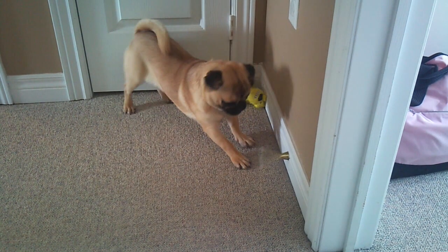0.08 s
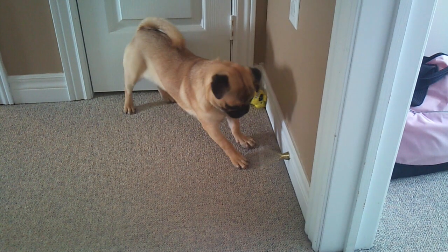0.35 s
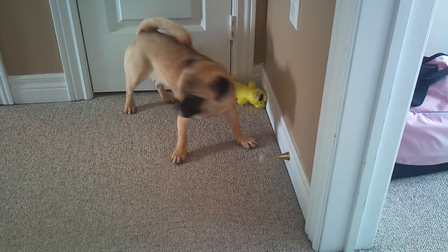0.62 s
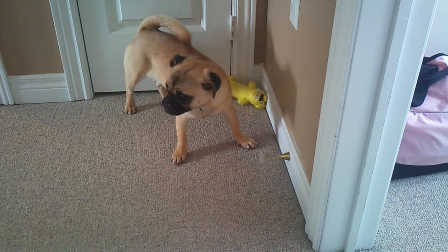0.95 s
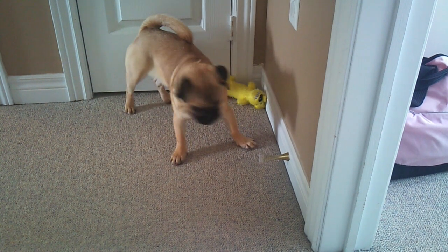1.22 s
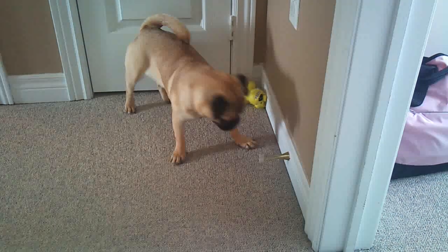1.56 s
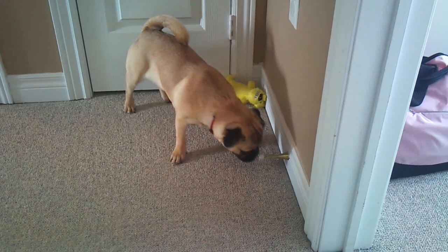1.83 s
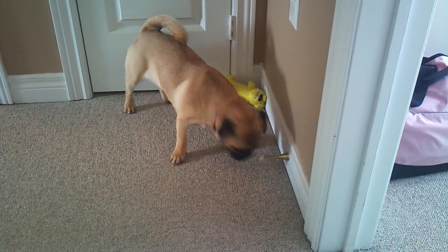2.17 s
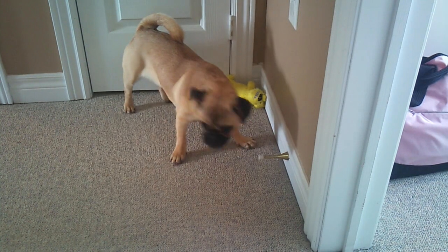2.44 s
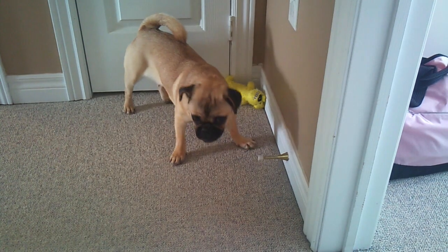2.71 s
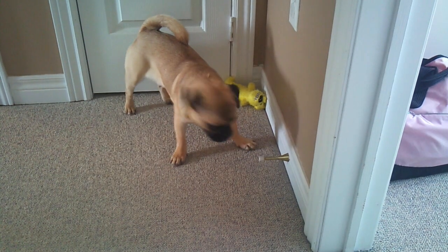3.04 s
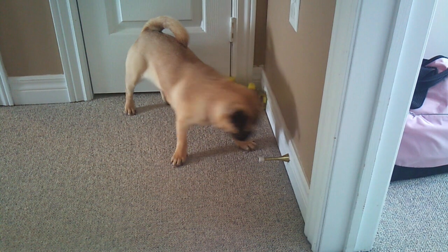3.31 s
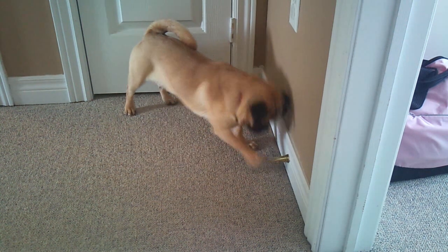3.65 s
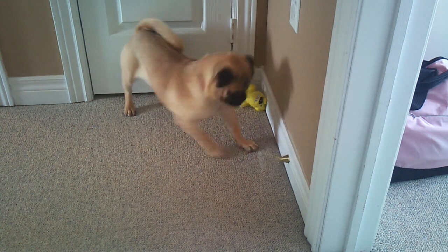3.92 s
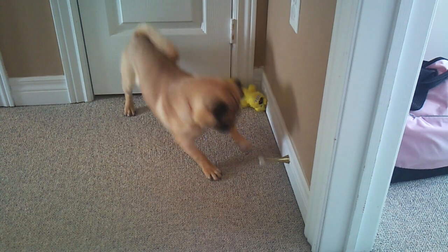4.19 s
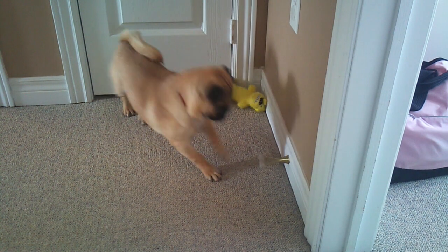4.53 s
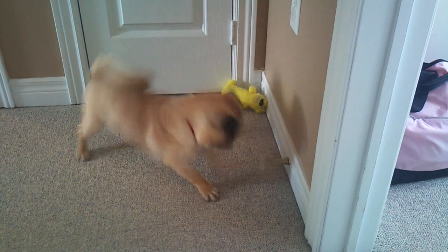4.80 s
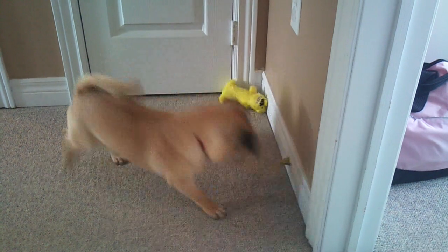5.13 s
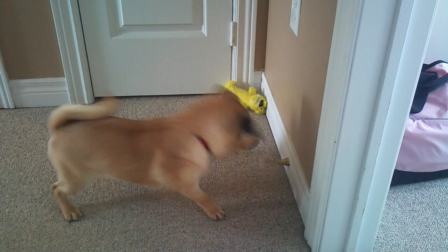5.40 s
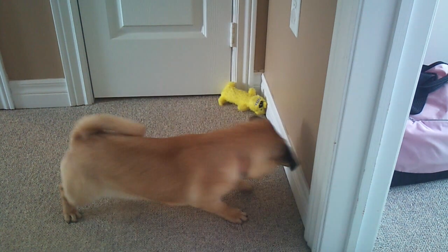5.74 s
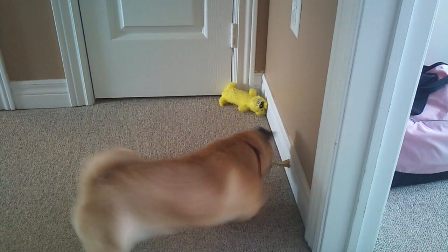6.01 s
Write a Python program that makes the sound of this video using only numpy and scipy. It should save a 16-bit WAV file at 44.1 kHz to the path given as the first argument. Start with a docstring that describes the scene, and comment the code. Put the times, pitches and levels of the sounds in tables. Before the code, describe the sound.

In a quiet hallway, a metal spring doorstop clacks and rattles rapidly as a dog bats it, the chatter fading over about three seconds. A harder swipe brings a loud buzzing boing, and further hits keep the coils clattering to the end. Dull thumps from the hollow wall, faint scuffs from the dog and the still air of the house lie beneath. The sound is slightly dulled on top and rings briefly in the hall.

```python
"""Metallic clacks, a hard buzzing twang and long dying chatters: a dog paws at a coiled spring doorstop
on the skirting board of a carpeted hallway. The spring swings and its coils slap together.
Every slap drives the same board and hollow wall, which ring into the hall.
Dull booms of the wall, the dog's soft scuffs and the still air of the house lie underneath."""
import sys
import numpy as np
from scipy import signal
from scipy.fft import rfft, irfft
from scipy.io import wavfile
from scipy.ndimage import uniform_filter1d

SR = 44100
rng = np.random.default_rng(int(sys.argv[2]) if len(sys.argv) > 2 else 0)


def master_out(mix):
    """Clip the mix to full scale and print it as 16-bit PCM to the path in sys.argv[1]."""
    frames = np.transpose(np.atleast_2d(mix))
    ceiling = np.clip(frames, -1, 1)
    pcm = np.round(ceiling * 32767).astype(np.int16)
    wavfile.write(sys.argv[1], SR, pcm)


N = 267246

# The spring is left to swing: (start [s], end [s], then at the start: knock [dB], thump [dB], slaps [1/s])
SWINGS = [(0.0, 0.33, -37.5, -54.5, 34.3), (0.5, 3.8, -40, -53, 32.5), (4.55, 5.27, -40.5, -50.5, 36),
          (5.36, 6.3, -41, -54.5, 37.4)]
THUMP_EDGE_HZ, TICK_EDGE_HZ = 532, 1720   # a slap's thump lies below these, its knock between, its tick above
CUTOFF_HZ, RESPONSE_SIZE = 7430, 32768


def from_db(db):
    """Decibels to gain."""
    return np.exp(np.asarray(db) * np.log(10) / 20)


def rms(x):
    """Root mean square."""
    return np.sqrt(np.mean(x ** 2) + 1e-20)


def at_hz(points, hz):
    """Read a table on a log-frequency axis."""
    known_hz, values = np.transpose(points)
    return np.interp(np.log(np.maximum(hz, 1)), np.log(known_hz), values)


def passed(x, hz, kind):
    """Second-order Butterworth filter."""
    return signal.sosfilt(signal.butter(2, hz, kind, fs=SR, output="sos"), x)


def air(level_db=-59.5):
    """Room tone: the faint, steady, low noise of the house."""
    # Colour of the still air: (frequency [Hz], relative level [dB])
    colour = [(25, -15.5), (60, -13.5), (120, -4), (170, 0.5), (250, 2.5), (400, -21.5), (800, -17.5),
              (1500, -25), (3000, -24.5), (7000, -32)]
    gain = from_db(at_hz(colour, np.fft.rfftfreq(N, 1 / SR)))
    noise = irfft(rfft(rng.standard_normal(N)) * gain, N)
    return from_db(level_db) * noise / rms(noise)


def scuffs():
    """The dog's short rubs: bands of noise that swell quickly and fade."""
    # Soft scuffs and brushes: (time [s], length [s], level [dB], low edge [Hz], high edge [Hz])
    rubs = [(2.06, .08, -65, 4200, 7000), (2.66, .065, -43, 850, 2000), (2.654, .045, -61, 2000, 6000),
            (3.742, .06, -59, 2250, 5530), (3.746, .07, -61.5, 2630, 2790)]
    out = np.zeros(N)
    for s, length, db, low_hz, high_hz in rubs:
        age = np.maximum(np.arange(N) / SR - s, 0) / (length / 4)
        rub = passed(rng.standard_normal(N), [low_hz, high_hz], "band")
        out += from_db(db) * age * np.exp(1 - age) * rub / rms(rub)
    return out


def wall_booms(swell_s=0.019, detune=0.029):
    """A soft push makes the hollow wall boom; the notes swell and die in about a tenth of a second."""
    # The wall's lowest modes: (frequency [Hz], relative level [dB])
    modes = [(170, -3), (250, -7.5)]
    # Dull bumps that set them booming: (time [s], level [dB])
    bumps = [(0.313, -35.5), (0.406, -37), (0.702, -34.5), (0.935, -45), (1.116, -35), (1.98, -43),
             (2.284, -47), (2.486, -41), (3.747, -63), (4.603, -42.5), (4.895, -45), (5.148, -45),
             (5.889, -36.5)]
    out = np.zeros(N)
    for (s, db), offsets in zip(bumps, rng.standard_normal((len(bumps), len(modes)))):
        age = np.maximum(np.arange(N) / SR - s, 0)
        notes = sum(from_db(mode_db) * np.sin(2 * np.pi * hz * (1 + detune * offset) * age)
                    for (hz, mode_db), offset in zip(modes, offsets))
        out += from_db(db) * age / swell_s * np.exp(1 - age / swell_s) * notes
    return out


def wire_ring(t, detune=0.017):
    """The coil's modes, struck together: a short metallic clank, tuned a little differently each call."""
    # Modes of the wire: (frequency [Hz], resonance height [dB], t60 [s])
    modes = [(1020, -3, 0.019), (1370, -9, 0.016), (2023, 7.5, 0.021), (2376, 11, 0.056),
             (3167, 10.5, 0.027), (3183, 8, 0.032), (3800, -1.5, 0.0064), (4130, 17, 0.021),
             (4806, 15, 0.019), (5140, -0.5, 0.016), (5650, 3, 0.022), (6240, -12.5, 0.027)]
    out = np.zeros(len(t))
    for (hz, db, t60), offset in zip(modes, rng.standard_normal(len(modes))):
        fade = from_db(-60 * t / t60)
        out += from_db(db) * fade / fade.sum() * np.sin(2 * np.pi * hz * (1 + detune * offset) * t)
    return out


def reflections(hall_db, clank_db, echo_db, mid_hz=1200, treble_hz=4500):
    """The wire's clank and the board's short ring, echoes off the near walls, then the hall's tail."""
    # How long the board rings: (frequency [Hz], t60 [s])
    board_t60 = [(152, 0.12), (352, 0.081), (1010, 0.015), (2210, 0.056), (5010, 0.026)]
    # How long the hall rings: (frequency [Hz], t60 [s])
    hall_t60 = [(150, 0.4), (350, 0.88), (1000, 0.23), (2200, 0.34), (5000, 0.35)]
    # The hall's tail against the board: (frequency [Hz], level [dB])
    hall_colour = [(150, -12), (1000, -10.5), (2200, -5), (5000, -9)]
    # The near walls throw each slap back: (delay [s], mid level [dB], treble level [dB])
    echoes = [(.0078, 1, -13.5), (0.011, -5, -4), (.028, -10, -19.5), (0.04, -9, -16)]
    t, hz = np.arange(RESPONSE_SIZE) / SR, np.fft.rfftfreq(RESPONSE_SIZE, 1 / SR)
    white = rfft(rng.standard_normal(RESPONSE_SIZE))
    out = from_db(clank_db) * wire_ring(t)
    octaves_hz = np.geomspace(125, 8000, 7)
    for centre, share in zip(octaves_hz, np.eye(len(octaves_hz))):
        band = irfft(white * at_hz(list(zip(octaves_hz, share)), hz))
        arrivals = [(0, 0)] + [(s, echo_db + at_hz([(mid_hz, mid), (treble_hz, treble)], centre))
                               for s, mid, treble in echoes]
        board_power = sum((t >= s) * from_db(db - 60 * abs(t - s) / at_hz(board_t60, centre)) ** 2
                          for s, db in arrivals)
        hall = from_db(hall_db + at_hz(hall_colour, centre) - 60 * t / at_hz(hall_t60, centre))
        out += band * np.sqrt(board_power + hall ** 2)
    return out


def faded(response):
    """Let the second half of a response sink to nothing."""
    return response * np.minimum(np.linspace(2, 0, len(response)), 1) ** 2


def evened(response, smoothing_bins=(25, 200)):
    """Flatten chance peaks: closely where the resonances stand apart, loosely where they crowd."""
    hz, spectrum = np.fft.rfftfreq(RESPONSE_SIZE, 1 / SR), rfft(response)
    power = abs(spectrum) ** 2
    fine, wide = (uniform_filter1d(uniform_filter1d(power, n), n) for n in smoothing_bins)
    return faded(irfft(spectrum / np.sqrt(np.where(hz < TICK_EDGE_HZ, fine, wide))))


def causal(gain):
    """The minimum-phase filter that has these gains: it rings only after the blow."""
    cepstrum = irfft(np.log(gain + 1e-9))
    half = len(cepstrum) // 2
    cepstrum[1:half] *= 2
    cepstrum[half + 1:] = 0
    return np.exp(rfft(cepstrum))


def coil_chirp(hz, lag_s, from_hz=4300):
    """Phase of waves on the coil: the highest arrive late, so each slap ends in a tiny upward chirp."""
    delay = lag_s * np.clip((hz - from_hz) / (CUTOFF_HZ - from_hz), 0, 1)
    return np.exp(-2j * np.pi * np.cumsum(delay) * hz[1])


def wall_response(hall_db, chirp_s, clank_db=24.5, echo_db=0.0, ring=()):
    """One slap as heard in the hall: the reflections, coloured by the resonances of wall and coil."""
    # Broad colour of the wall: (frequency [Hz], level [dB])
    colour = [(45.45, -21.5), (101.0, -12.5), (151.5, -1.5), (323.2, -4), (404.0, -11), (707.0, 1),
              (1111.0, 2), (1717.0, -4.5), (2525.0, -10.5), (3737.0, -13.5), (4848.0, -17.5),
              (5858.0, -19.5), (6969.0, -25), (7474.0, -48)]
    # Resonances of board, wall and coil: (frequency [Hz], width [Hz], lift above the colour [dB])
    resonances = [(171, 15, 13.5), (203, 30, 4.5), (249.8, 19.7, 13), (290.5, 11, 5), (322.5, 28, 14),
                  (350.3, 39, 11), (423, 23, 13), (509, 23, 7), (580, 23, 8), (660, 15, 9.5), (791, 57, 9),
                  (933, 55, 7.5), (1016, 72, 9), (1059, 35, 5.5), (1117, 21, 7.5), (1200, 30, 2),
                  (1272.7, 57, 12), (1354, 22, 7), (1399, 18, 5), (1462, 88, 4), (1530, 11, 8.5),
                  (1625, 15, 8.5), (1955, 130, 3), (2506, 180, 4.5), (2930, 540, 4.5), (3290, 120, 6),
                  (4306, 280, 7), (4690, 260, 6), (5150, 210, 5), (6476, 140, 7)]
    hz = np.fft.rfftfreq(RESPONSE_SIZE, 1 / SR)
    peaks_db = sum(db / (1 + (2 * (hz - centre) / width) ** 2)
                   for centre, width, db in [*resonances, *ring])
    body = causal(from_db(at_hz(colour, hz) + peaks_db))
    space = rfft(evened(reflections(hall_db, clank_db, echo_db)))
    response = irfft(space * body * coil_chirp(hz, chirp_s))
    return passed(faded(response), 46, "high")


def registers(response, opening_samples=(882, 4410, 882)):
    """The knock, thump and tick of a response, each with rms 1 over its loud opening."""
    def split(x, hz):
        return [passed(passed(x, hz, kind), hz, kind) for kind in ("low", "high")]
    thump, rest = split(response, THUMP_EDGE_HZ)
    knock, tick = split(rest, TICK_EDGE_HZ)
    return [part / rms(part[:size]) for part, size in zip((knock, thump, tick), opening_samples)]


def play(contacts, response):
    """Contacts at one place on the coil share a response: (time [s], knock [dB], thump [dB], tick [dB])."""
    onsets = np.clip(np.round(contacts[:, 0] * SR).astype(int), 0, N - 1)
    out = np.zeros(N)
    for level_db, part in zip(contacts[:, 1:].T, registers(response)):
        impulses = np.bincount(onsets, from_db(level_db), N)
        out += signal.oaconvolve(impulses, part)[:N]
    return out


def rebounds(hits, softer_db, within_s, after_s=0, count=3, spread_db=8):
    """A slap runs along the spring and other coils touch just after; softer_db is (knock, thump, tick)."""
    rows = np.repeat(hits, count, axis=0)
    late, weak = rng.random((len(rows), 2)).T
    times = rows[:, 0] + after_s + within_s * late
    return np.column_stack([times, rows[:, 1:] + softer_db - spread_db * weak[:, None]])


def swing_left(age, settle_s=3.6, damping_db_per_s=2.1, least=.07):
    """The share of a swing that is left: dry friction shrinks it linearly, the mount damps it further."""
    return np.clip((1 - age / settle_s) * from_db(-damping_db_per_s * age), least, 1)


def slap_rate(times, settled_per_s=44):
    """Slaps per second: the smaller the swing, the quicker."""
    start, *_, first_rate = np.transpose(SWINGS)
    latest = np.maximum(np.searchsorted(start, times) - 1, 0)
    return settled_per_s + (first_rate[latest] - settled_per_s) * swing_left(times - start[latest])


def light_touches(swing, knock_db=-6, tick_db=-15, thump_fade=0.61, uneven_db=3, jitter_s=.0022):
    """The coils touch on every half swing, never quite in time or equally hard; the thump fades slowest."""
    start, end, swing_db, thump_db, _ = swing
    most_touches = 160
    timing, force, sharpness = np.clip(rng.standard_normal((most_touches, 3)).T, -2, 2)
    t = np.arange(int(start * SR), int(end * SR)) / SR
    times = np.interp(np.arange(most_touches), np.cumsum(slap_rate(t)) / SR, t)
    shrink_db = 20 * np.log10(swing_left(times - start))
    knock = swing_db + knock_db + shrink_db + uneven_db * force
    thump = thump_db + thump_fade * shrink_db + uneven_db * force
    tick = swing_db + tick_db + shrink_db + uneven_db * sharpness
    return np.column_stack([times + jitter_s * timing, knock, thump, tick])[times < t[-1]]


def lulled(touches, hits, lull_s=0.016, lull_db=6.5):
    """The coils part just before a clack, so the chatter sinks; the wall hums on."""
    s, knock, thump, tick = touches.T
    ahead = hits[:, 0] - s[:, None]
    wait = np.where(ahead > 0, ahead, np.inf).min(axis=1)
    sink_db = lull_db * np.exp(-(wait / lull_s) ** 2)
    return np.column_stack([s, knock - sink_db, thump, tick - sink_db])


def chatter(hits):
    """The free swing touches the two sides of the coil in turn, each time with a few softer rebounds."""
    light = np.vstack([light_touches(swing) for swing in SWINGS])
    after = rebounds(light, softer_db=(-6.5, -10, -5.5), within_s=.016)
    return sum(play(lulled(touches, hits), wall_response(hall_db=1.0, chirp_s=.0045))
               for touches in (light[0::2], light[1::2], after))


def slaps(times, knock_db, tick_db, middling_knock_db=-38.5, middling_thump_db=-49, thump_growth=0.82):
    """Contacts of given force: the wall's thump grows more slowly than the knock."""
    thump_db = middling_thump_db + thump_growth * (knock_db - middling_knock_db)
    return np.column_stack([times, knock_db, thump_db, knock_db + tick_db])


def surges(start_s=3.0615, period_s=.187, count=4, knock_db=-50, fade_db_per_s=11, tick_db=-12):
    """The two bending planes beat as the swing dies: at each surge the coils meet twice, a swing apart."""
    age = period_s * np.arange(count)
    times, level_db = start_s + age, knock_db - fade_db_per_s * age
    first = slaps(times, level_db, tick_db)
    second = slaps(times + 2 / slap_rate(times), level_db - 2, tick_db)
    rows = np.vstack([first, second])
    rows[:, 2] -= 4   # less thump: they hardly move the wall
    return rows


def clacks(hits, hard_above_db=-28.3, places=3):
    """Hard blows clank; lighter ones land at a few places on the coil, each with its own ring."""
    # How the coil's ring changes when struck hard: (frequency [Hz], width [Hz], gain [dB])
    hard_ring = [(175, 54, -6.5), (520, 140, 0.5), (1900, 270, 3.5), (3070, 330, 3), (3650, 420, -2),
                 (4450, 600, 3), (5900, 450, -6)]
    hard = hits[:, 1] > hard_above_db
    after = rebounds(hits, softer_db=(-11, -11, -14), within_s=.016)
    lighter = sum(play(hits[~hard][k::places], wall_response(hall_db=-2.0, chirp_s=.003, clank_db=22.5))
                  for k in range(places))
    clank = wall_response(hall_db=-2.5, chirp_s=.00099, clank_db=28.0, echo_db=0.5, ring=hard_ring)
    return play(hits[hard], clank) + lighter + play(after, wall_response(hall_db=3.5, chirp_s=.0036))


def twang_slaps(start_s=3.981, gap_s=.032, shortening_s=.00042, lead_s=.0019, count=16):
    """The swings quicken and dull as they shrink; the back swing strikes early, softer and duller."""
    # each is (knock, thump, tick)
    start_db, fade_db_per_s, back_swing_db = (-26.5, -37, -29.5), (16, 14, 30), (-0.5, -0.5, -3.0)
    k = np.arange(count)
    back = k % 2
    age = k * gap_s - shortening_s * k ** 2 / 2 - lead_s * back
    levels = np.array(start_db) - np.outer(age, fade_db_per_s) + np.outer(back - .5, back_swing_db)
    return np.column_stack([start_s + age, levels])


def twang():
    """The wide swing slaps each side of the coil in turn; neighbouring coils close after it and rasp."""
    # How the coil's ring changes when it swings wide: (frequency [Hz], width [Hz], gain [dB])
    wide_ring = [(165, 60, -2.5), (253, 30, 1.5), (319, 21, 2), (396, 58, -10.5), (865, 32, -12.5),
                 (1020, 230, -1), (1560, 180, 1), (1930, 250, 3), (5150, 220, 0), (6700, 400, -0.5)]
    out, buzz = np.zeros(N), twang_slaps()
    for side in (buzz[0::2], buzz[1::2]):
        rasp = rebounds(side, softer_db=(-10, -22, -3), within_s=.004)
        knocks = rebounds(side, softer_db=(-6, -18, -14), after_s=.005, within_s=.00317, count=1)
        response = wall_response(hall_db=-2.5, chirp_s=.0048, clank_db=24.0, echo_db=-0.5, ring=wide_ring)
        out += play(np.vstack([side, rasp, knocks]), response)
    return out


def doorstop():
    """The spring: clacks, the twang and the chatter between them."""
    # The coils clack together: (time [s], knock [dB], tick against the knock [dB])
    blows = [(0.018, -38.5, -12), (0.16, -49, -1), (0.186, -45, -9), (0.222, -42.5, -7), (0.248, -47, -5),
             (0.284, -37.5, -7.5), (0.312, -49.5, 0), (0.348, -35.5, -6.5), (0.376, -27.5, -1.5),
             (0.409, -30, -6), (0.440, -34.5, -6.5), (0.469, -28, -6.5), (0.625, -43.5, -12),
             (0.650, -50, -6), (0.687, -45, -1), (0.714, -36, -9.5), (0.745, -43, -4.5), (0.867, -44.5, -8),
             (0.899, -41, -13), (0.925, -33, -6), (0.955, -34.5, -14), (1.008, -45, -10),
             (1.102, -40, -5.5), (1.127, -43, -10), (1.246, -46, -7), (1.273, -38.5, -9),
             (1.300, -36, -11.5), (1.387, -50, -5), (1.441, -45, -9), (1.465, -59, -1),
             (1.551, -44.5, -8.5), (1.575, -39.5, -14), (1.662, -37, -11.5), (1.683, -41, -9),
             (1.768, -38.5, -10.5), (1.979, -44, -10), (2.053, -45, -12), (2.183, -47, -8.5),
             (2.283, -50.5, -9.5), (2.382, -46, -10), (2.483, -46.5, -11), (2.506, -50, -13),
             (2.58, -44, -15), (2.667, -42, -19), (2.822, -51, -13), (2.918, -47, -12), (3.954, -21, -5),
             (4.482, -19.5, -2), (4.833, -45, -8), (4.885, -29, -7), (4.963, -31.5, -8.5),
             (4.990, -36.5, -10), (5.052, -46, -3.5), (5.085, -43.5, -12), (5.143, -35, -3.5),
             (5.167, -34, -21), (5.313, -26, -5), (5.33, -28.5, -5), (5.415, -40, -11), (5.629, -40, -8),
             (5.654, -29, -7.5), (5.680, -33.5, -15), (5.736, -31, -9), (5.932, -37.5, -9.5),
             (5.955, -38.5, -7)]
    hits = np.vstack([slaps(*np.transpose(blows)), surges()])
    return clacks(hits) + twang() + chatter(hits)


def scene():
    """The quiet house, the dog's scuffs, the wall's boom and the spring, in mono."""
    return (air() + scuffs() + wall_booms() + doorstop())[None]


def record(dry):
    """A narrow-band microphone channel: a steep low-pass takes off the top."""
    return signal.sosfilt(signal.ellip(10, .3, 70, CUTOFF_HZ, fs=SR, output="sos"), dry)


dry = scene()
out = record(dry)
master_out(out)
```